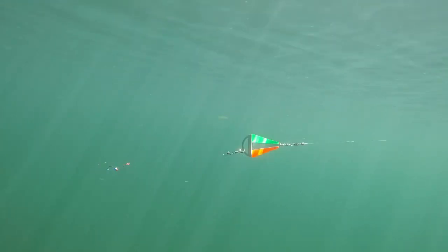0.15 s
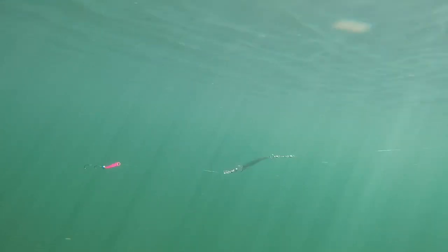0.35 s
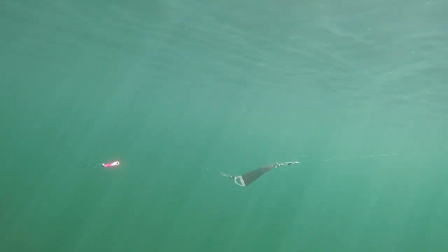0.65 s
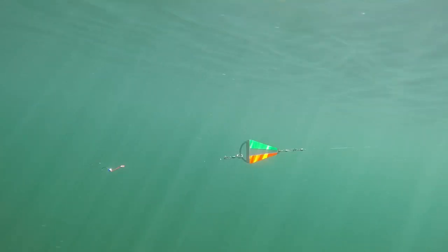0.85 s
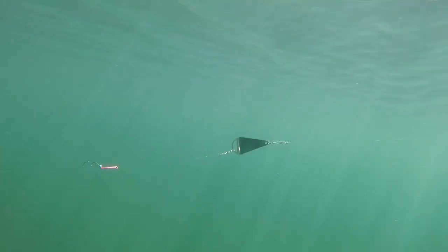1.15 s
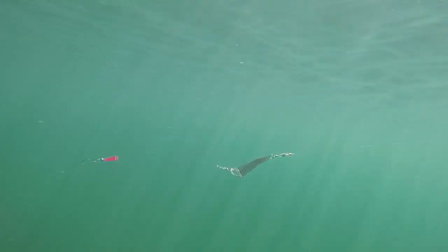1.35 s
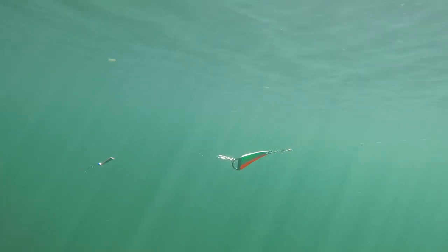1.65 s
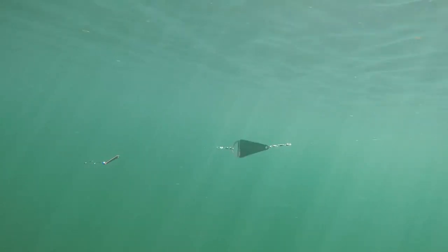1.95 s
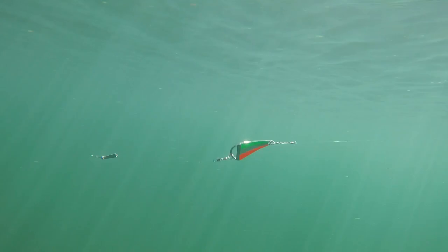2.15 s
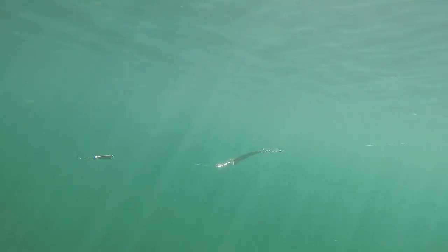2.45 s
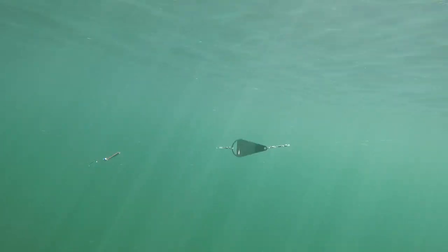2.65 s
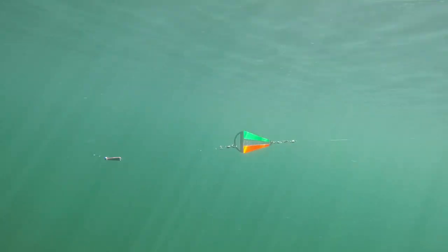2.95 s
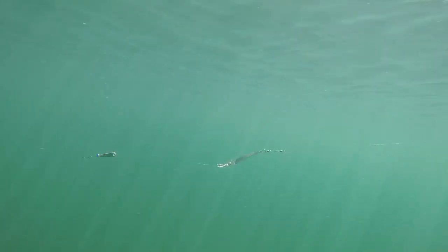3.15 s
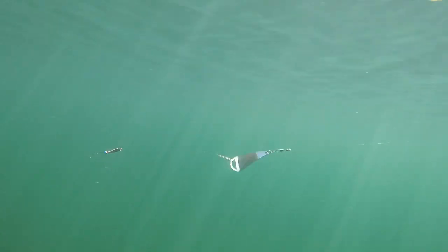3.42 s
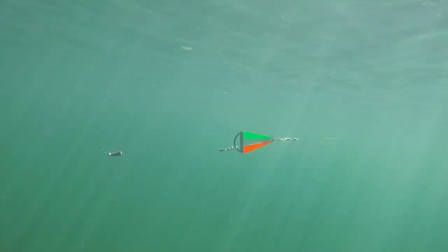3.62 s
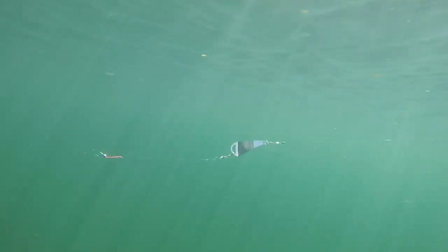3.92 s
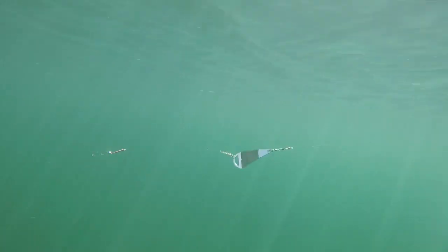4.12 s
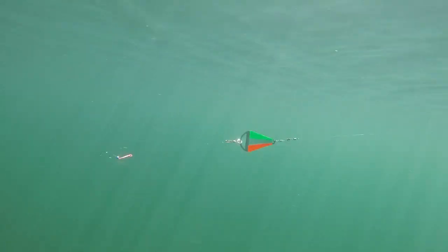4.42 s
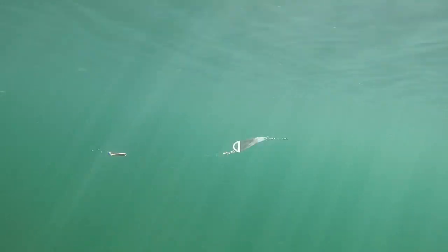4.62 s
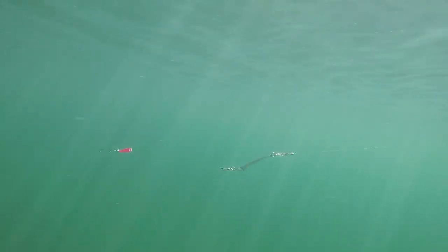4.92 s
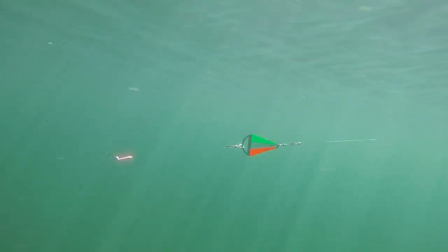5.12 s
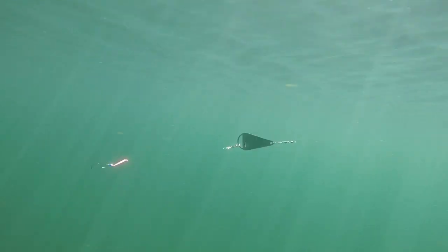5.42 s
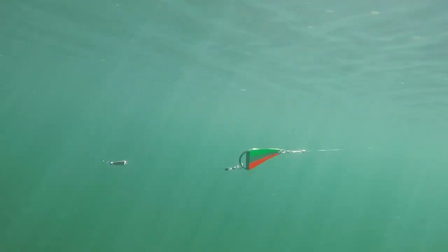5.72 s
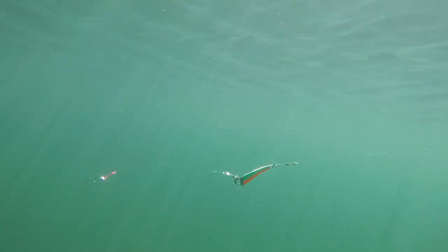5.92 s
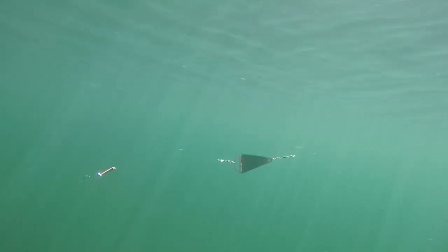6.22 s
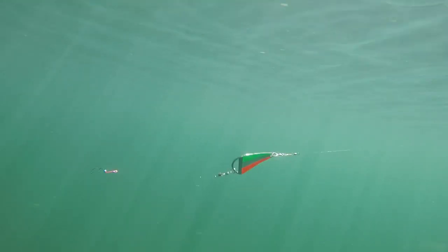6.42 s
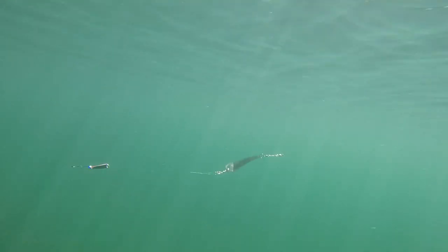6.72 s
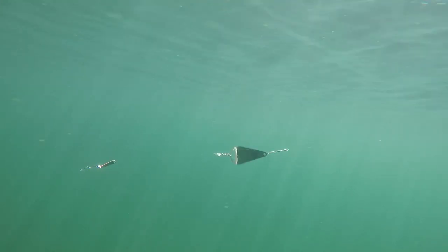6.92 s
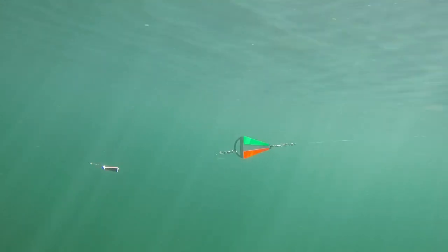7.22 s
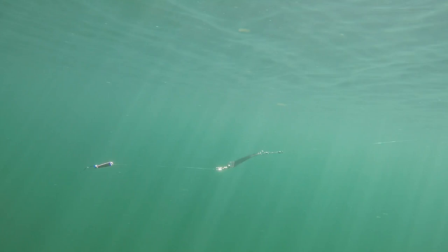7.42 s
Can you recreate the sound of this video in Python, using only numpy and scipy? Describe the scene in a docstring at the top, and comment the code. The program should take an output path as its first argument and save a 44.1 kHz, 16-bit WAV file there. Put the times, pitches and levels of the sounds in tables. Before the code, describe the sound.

For about 7.5 seconds, a microphone sealed in a waterproof case is towed beneath a lake's surface with a fishing rig. Deep, wavering flow rumble and quicker low buffeting run throughout, over thin hiss. Bubbles ping, tick and glug irregularly from the start, with short dull resonance from the case. From 0.25 s soft low thumps knock the housing, several in pairs, firmer around 0.9 s. From 0.3 s a faint, high whistling electronic rasp swells about three times a second. A clear bubble ping stands out near 2.05 s. Crackling bubbles gather from 3.7 s, and at 4.25 s the heaviest thump makes everything duck, then slowly recover. More thumps come near 5 and 5.45 s, with bubbles bursting around 6 to 6.3 s. At 6.65 s an air pocket gives a tiny upward warble, under a tenth of a second long; pings and fine spray follow near 7 s.

```python
"""Underwater: a camera in a waterproof case is towed through a lake.
From the start, shaped noise rumbles over a hiss, while gliding, dying sine notes ping, tick and glug as bubbles.
From 0.25 s pairs of low notes thump the case; from 0.3 s the camera's electronics rasp about three times
a second, as swells of band noise. Near 4.25 s the hardest thump makes the limiter duck everything.
Near 6.65 s an air pocket warbles upward, a swept sine with one overtone."""
import sys
import numpy as np
from scipy import signal
from scipy.fft import rfft, irfft, next_fast_len
from scipy.io import wavfile
from scipy.ndimage import uniform_filter1d, minimum_filter1d, map_coordinates

SR = 44100
rng = np.random.default_rng(int(sys.argv[2]) if len(sys.argv) > 2 else 0)


def wav_out(sig):
    """Save sig, one row per channel (or a flat mono array), as 16-bit PCM at SR to the path in sys.argv[1]."""
    wavfile.write(sys.argv[1], SR, np.round(np.clip(np.atleast_2d(sig).T, -1, 1) * 32767).astype(np.int16))


N = 333837
TIME = np.arange(N) / SR

# spectrum of the larger wake bubbles: (frequency [Hz], relative density [dB])
WAKE_SPECTRUM = [(300, -28), (470, -16), (600, 0), (770, -9.5), (1000, -2), (1300, 2), (1700, -4.5),
                 (2050, -5.5), (2430, -4), (2750, -14), (3200, -25), (4400, -29.5)]
# spectrum of fine spray: (frequency [Hz], relative density [dB])
SPRAY_SPECTRUM = [(2500, -3.5), (3150, -1), (3450, 3), (3900, 5.5), (4350, -16), (5200, 1), (6200, -10.5),
                  (7300, -11), (8200, -17), (10200, -14), (15000, -23)]
# air pockets bursting into crackle: (time [s], level before trim [dB])
SPLASH_EVENTS = [(0.057, -26), (0.754, -30), (0.899, -17), (1.137, -20), (2.053, -20), (2.841, -35),
                 (3.659, -15), (3.901, -16.5), (3.972, -15.5), (4.167, -15), (4.248, -16), (5.367, -16.5),
                 (5.535, -35), (5.715, -19), (6.002, -26), (6.094, -23), (6.3, -13.5), (6.557, -26),
                 (6.929, -16), (6.973, -17.5)]


def from_db(db):
    """Decibels to amplitude gain."""
    return 10 ** (np.asarray(db) / 20)


def rms_one(x):
    """Scale to unit power."""
    return x / np.sqrt(np.mean(x ** 2) + 1e-20)


def in_time(rows):
    """Interpolate each column of a curve at every sample."""
    s, *columns = np.transpose(rows)
    return [np.interp(TIME, s, column) for column in columns]


def at_hz(points, hz):
    """Spectrum gain at the given frequencies; falls 12 dB an octave beyond its last point."""
    f, db = np.transpose(points)
    gain = from_db(np.interp(np.log(hz + 1e-3), np.log(f), db))
    return gain / np.maximum(hz / f[-1], 1) ** 2


def coloured(x, spectrum):
    """Shape a sound by a spectrum; white noise keeps its power."""
    size = next_fast_len(N)
    gain = rms_one(at_hz(spectrum, np.fft.rfftfreq(size, 1 / SR)))
    return irfft(rfft(x, size) * gain, size)[:N]


def drift(rate):
    """Smooth random curve of spread 1 through `rate` random knots a second."""
    knots = rng.standard_normal(4000)
    curve = map_coordinates(knots, [TIME[::20] * rate], order=3, mode="wrap")
    return rms_one(curve).repeat(20)[:N]


def noise(spectrum, lumpy_db, rate):
    """Coloured noise of unit power whose level wanders before colouring."""
    lumpy = rng.standard_normal(N) * from_db(lumpy_db * drift(rate))
    return rms_one(coloured(lumpy, spectrum))


def resonate(x, hz, width_hz):
    """Two-pole resonance with gain 1 on top."""
    r = np.exp(-np.pi * width_hz / SR)
    b = np.array([1, 0, -1]) * (1 - r * r) / 2
    a = [1, -2 * r * np.cos(2 * np.pi * hz / SR), r * r]
    return signal.lfilter(b, a, x + 1e-18)


def add(out, s, sound):
    """Mix a sound in at time s."""
    start = int(np.clip(s * SR, 0, N - 1))
    out[start:start + len(sound)] += sound[:N - start]


def gliding_notes(rows, peak_s, compact, glide):
    """Notes that swell until about peak_s, then die; higher compact shortens the tail."""
    out = np.zeros(N)
    for (s, db, hz), (life, bend, sign) in zip(rows, rng.standard_normal((len(rows), 3))):
        peak = peak_s * from_db(1.55 * life)
        t = TIME[:int(9 * peak * SR) + 2]
        shape = (t / peak * np.exp(1 - t / peak)) ** compact
        # the pitch passes through hz at the peak
        phase = 2 * np.pi * hz * t * (1 + glide * (1 + bend) * (t / peak - 2))
        add(out, s, np.sign(sign) * from_db(db) * shape * np.sin(phase))
    return out


def snaps(rows, t60, rise_s):
    """A quick, dying burst of white noise for each row."""
    out, t = np.zeros(N), TIME[:SR // 8]
    for s, db, *_ in rows:
        envelope = from_db(db - 60 * t / t60) * (1 - np.exp(-t / rise_s))
        add(out, s, envelope * rng.standard_normal(len(t)))
    return out


def bursts(times, rise_s, fall_s):
    """A smooth Gaussian swell around each time."""
    out, t = np.zeros(N), TIME[:SR // 2] - 1 / 4
    for s in times:
        add(out, s + t[0], np.exp(-(t / np.where(t < 0, rise_s, fall_s)) ** 2))
    return out


def swarm(spectrum, low_hz, high_hz, spread_db, count):
    """Rows (time [s], level [dB], pitch [Hz]) of bubbles born at random, most of them faint."""
    when, size, pitch = rng.random((count, 3)).T
    hz = low_hz * (high_hz / low_hz) ** pitch
    tilt_db = 20 * np.log10(at_hz(spectrum, hz) * hz / low_hz)
    db = spread_db * np.minimum(-np.log(size), 3) + tilt_db
    return np.transpose([when * N / SR, db, hz])


def electronics():
    """Steady hiss and a thin whistling rasp; every other burst is fuller near 9.1 kHz."""
    # hiss and rasp spectra: (frequency [Hz], relative density [dB])
    hiss_spectrum = [(1000, 10), (5000, 1.5), (9000, -0.5), (12000, -4.5), (14000, -5.5), (15000, -28)]
    rasp_spectrum = [(2500, -5), (5500, -1.5), (8000, -5), (9400, -0.5), (10300, -13.5), (12400, -1.5),
                     (13000, 6.5), (13500, -5), (15000, -5.5)]
    # whistles within the rasp: (frequency [Hz], width [Hz], relative level [dB])
    whistles = [(2984, 100, 4), (9900, 140, -13), (11740, 110, -13.5), (12770, 180, -7), (13080, 110, -8)]
    # each period is longer than the last by slackens_s
    first_s, period_s, slackens_s = .306, .3486, .00056

    white = rng.standard_normal(N)
    whine = sum(from_db(db) * rms_one(resonate(resonate(white, hz, w), hz, w)) for hz, w, db in whistles)
    rasp = from_db(-59.5) * noise(rasp_spectrum, lumpy_db=1.5, rate=550)
    rasp = rasp + from_db(-62.5 + 4.5 * drift(27)) * whine
    fuller = from_db(-62) * rms_one(resonate(resonate(white, 9100, 1700), 9100, 1700))
    k = np.arange(int(N / SR / period_s))
    times = first_s + period_s * k + slackens_s * k * (k - 1) / 2
    pulsing = bursts(times, rise_s=0.07, fall_s=0.045) * rasp
    pulsing += bursts(times[::2], rise_s=0.052, fall_s=.035) * fuller
    return pulsing + from_db(-61.5) * coloured(rng.standard_normal(N), hiss_spectrum)


def wake(churn_db, fizz_db):
    """Far bubbles: a swarm of faint pings and snaps over a thin wash."""
    far = gliding_notes(swarm(WAKE_SPECTRUM, 703, 2886, spread_db=6.0, count=1700),
                        peak_s=0.0021, compact=0.67, glide=0.006)
    fine = gliding_notes(swarm(SPRAY_SPECTRUM, 3110, 10550, spread_db=5.5, count=1100),
                         peak_s=0.00096, compact=1.3, glide=0.0016)
    when, size = rng.random((2, 420))
    pops = np.transpose([when * N / SR, 9.8 * np.minimum(-np.log(size), 3)])
    dull = rms_one(coloured(snaps(pops, t60=0.078, rise_s=0.00062), WAKE_SPECTRUM))
    sharp = rms_one(coloured(snaps(pops, t60=0.0088, rise_s=.002), SPRAY_SPECTRUM))

    churn = from_db(-3.5) * rms_one(far) + from_db(-4.5) * dull
    churn += from_db(-12) * noise(WAKE_SPECTRUM, lumpy_db=3.5, rate=55)
    fizz = from_db(0.5) * rms_one(fine) + from_db(-1) * sharp
    fizz += from_db(-12.5) * noise(SPRAY_SPECTRUM, lumpy_db=3.5, rate=94)
    return from_db(churn_db) * churn + from_db(fizz_db) * fizz


def gurgles(slosh_db):
    """Water burbles and big bubbles glug; one air pocket warbles upward with a weak overtone."""
    # large bubbles: (time [s], level before trim [dB], pitch [Hz])
    large_bubbles = [(0.059, -31, 617), (0.752, -33.5, 480), (1.135, -27, 570), (1.389, -29, 473),
                     (2.051, -24, 472), (2.416, -30, 516), (2.54, -30, 475), (3.33, -29.5, 490),
                     (3.933, -17.5, 607), (4.012, -27.5, 646), (4.164, -24, 381), (4.259, -19, 445),
                     (4.791, -27, 520), (5.481, -19, 572), (5.852, -30, 486), (6.002, -25, 676),
                     (6.105, -33, 598), (6.327, -20, 467), (6.557, -29, 584), (6.983, -27.5, 627),
                     (7.287, -28, 637)]
    # air pocket tearing away: (time [s], pitch [Hz], level before wobble [dB])
    pocket_path = [(6.645, 350, -54), (6.663, 455, -22), (6.68, 558, -36), (6.697, 604, -20),
                   (6.71, 560, -32), (6.725, 600, -33), (6.745, 620, -69)]
    # spectrum of the burble and spill: (frequency [Hz], relative density [dB])
    hollow_spectrum = [(280, 4.5), (390, 4), (465, -4), (520, 3), (585, -9), (740, -17.5), (840, -4),
                       (1100, -23)]

    burble = gliding_notes(swarm(hollow_spectrum, 393, 950, spread_db=6, count=260),
                           peak_s=.006, compact=0.47, glide=0.008)
    slosh = from_db(slosh_db - 3.5) * rms_one(burble)
    glugs = from_db(-5.5) * gliding_notes(large_bubbles, peak_s=0.0068, compact=0.87, glide=0.0028)
    spill = from_db(1) * coloured(snaps(large_bubbles, t60=0.077, rise_s=0.0013), hollow_spectrum)

    hz, db = in_time(pocket_path)
    phase = 2 * np.pi * np.cumsum(hz * (1 + 0.032 * drift(150))) / SR
    alive = (TIME > pocket_path[0][0]) & (TIME < pocket_path[-1][0])
    tone = np.sin(phase) + from_db(-14) * np.sin(2.5 * phase)
    pocket = alive * from_db(db + 2.0 * drift(120)) * tone
    return slosh + glugs + spill + pocket


def strays(level_db, low_hz, high_hz, over_db, spread_db, count):
    """Rows (time [s], level [dB], pitch [Hz]): a bubble per equal time slot, about over_db above level_db."""
    when, size, pitch = rng.random((count, 3)).T
    at = ((np.arange(count) + when) / count * N).astype(int)
    db = level_db[at] + over_db + spread_db * (size - .5)
    return np.transpose([at / SR, db, low_hz * (high_hz / low_hz) ** pitch])


def shed(low_hz, high_hz, spread_db, count):
    """Rows (time [s], level [dB], pitch [Hz]) of the bubbles each bursting pocket breaks into."""
    shed_s, below_db = .035, 16
    s, db = np.repeat(SPLASH_EVENTS, count, axis=0).T
    late, size, pitch = rng.random((len(s), 3)).T
    hz = low_hz * (high_hz / low_hz) ** pitch
    return np.transpose([s + shed_s * late, db - below_db - spread_db * size, hz])


def near_bubbles(churn_db, fizz_db):
    """Bubbles snap off, then ring, low ones longest; bursting pockets crackle and shed bubbles."""
    # close pinging bubbles: (time [s], level before trim [dB], pitch [Hz])
    close_bubbles = [(0.004, -23.5, 1074), (0.063, -34.5, 1000), (0.312, -19.5, 1005), (0.42, -23, 2427),
                     (0.421, -28.5, 1470), (0.53, -23.5, 2053), (0.723, -23, 950), (0.753, -22.5, 1220),
                     (1.137, -28, 1910), (1.173, -27, 1037), (1.263, -28, 1000), (1.858, -17.5, 2335),
                     (2.052, -12.5, 1300), (2.076, -22.5, 2300), (2.843, -20.5, 1436), (2.853, -21, 1100),
                     (2.892, -24, 1167), (3.342, -29, 965), (3.519, -26.5, 1390), (3.681, -22.5, 2360),
                     (3.901, -25.5, 1294), (3.942, -18, 1300), (3.995, -30.5, 1050), (4.099, -34, 1260),
                     (4.175, -25, 1034), (4.203, -26.5, 1300), (4.226, -25, 2390), (4.973, -21.5, 1260),
                     (5.379, -25, 1070), (5.434, -23, 760), (5.482, -27, 772), (5.535, -28, 1760),
                     (5.611, -22, 2200), (5.64, -23, 1246), (5.969, -19.5, 1270), (6.002, -26, 1465),
                     (6.171, -28, 2190), (6.321, -28, 2140), (6.515, -21, 2450), (6.645, -24.5, 2390),
                     (6.67, -17.5, 917), (6.866, -26, 1820), (6.895, -18, 1340), (6.928, -17.5, 1126),
                     (6.972, -20.5, 1470), (6.989, -27.5, 1224), (7.247, -27.5, 2710), (7.318, -20, 1120),
                     (7.356, -22, 2400)]
    # smallest bubbles: (time [s], level before trim [dB], pitch [Hz])
    tick_bubbles = [(0.059, -19.5, 3320), (0.663, -32, 3720), (1.564, -28, 3920), (1.742, -35, 3430),
                    (2.222, -33.5, 5100), (2.343, -35.5, 4900), (2.844, -27.5, 3720), (3.658, -33, 7200),
                    (3.681, -32, 3900), (3.974, -27.5, 4830), (4.169, -35, 3500), (4.249, -35, 3480),
                    (4.959, -31, 3940), (6.03, -37, 5060), (6.092, -24, 2870), (6.17, -31.5, 3770),
                    (6.671, -32.5, 3660), (6.423, -34, 3820), (6.7, -35, 5360), (6.971, -26.5, 3700),
                    (7.039, -36, 5130)]

    bubbles = np.vstack([close_bubbles,
                         strays(churn_db, 950, 1500, over_db=12.5, spread_db=3.5, count=18),
                         strays(churn_db, 2100, 2500, over_db=8.5, spread_db=14.5, count=14)])
    tiny = np.vstack([tick_bubbles,
                      strays(fizz_db, 3430, 5500, over_db=21, spread_db=4.5, count=22)])
    pings = from_db(1.0) * gliding_notes(bubbles, peak_s=0.0022, compact=1.16, glide=0.0074)
    # low bubbles get louder tails
    tail_rows = [(s, db - 7 * np.log2(hz / 1000), hz) for s, db, hz in bubbles]
    tails = from_db(-5.5) * gliding_notes(tail_rows, peak_s=0.0044, compact=0.53, glide=0.0024)
    ticks = from_db(-2.5) * gliding_notes(tiny, peak_s=0.00091, compact=0.69, glide=0.0022)
    crackle = from_db(-9) * snaps(bubbles, t60=0.046, rise_s=0.0022)
    crackle += from_db(-10.0) * snaps(SPLASH_EVENTS, t60=0.071, rise_s=0.00065)
    fragments = gliding_notes(shed(944, 2600, spread_db=5.5, count=4),
                              peak_s=0.0021, compact=0.92, glide=0.0028)
    spit = from_db(-2.5) * coloured(snaps(tiny, t60=0.0048, rise_s=0.00084), SPRAY_SPECTRUM)
    return pings + tails + ticks + coloured(crackle, WAKE_SPECTRUM) + fragments + spit


def scatter(x, t60, delay):
    """Dense weak echoes from the surface and inside the case: a decaying noise tail."""
    t = TIME[:SR // 5]
    tail = rng.standard_normal(len(t)) * from_db(-60 * t / t60) * (1 - np.exp(-t / delay))
    return signal.fftconvolve(x, tail / np.linalg.norm(tail))[:N]


def case(x):
    """Bubble sound passes the wall, sets its modes ringing and leaves a short smear."""
    # case resonances: (frequency [Hz], t60 [s], relative level [dB])
    wall_modes = [(482, 0.094, 9.5), (600, 0.12, -6), (787, 0.12, 4), (1012, 0.044, 14), (1180, 0.098, -6),
                  (1870, 0.058, -1.5), (2355, 0.014, 4.5), (3380, 0.022, 6)]
    ringing = sum(from_db(db) * resonate(x, hz, np.log(1000) / (np.pi * t60)) for hz, t60, db in wall_modes)
    through = from_db(-0.5) * (x + from_db(-13.5) * ringing)
    return through + from_db(-11.5) * scatter(x, t60=0.058, delay=0.0032)


def turbulence(rumble_db, buffet_db):
    """Slow pressure swings and quicker eddies; a hard eddy rocks the case and flexes its wall."""
    # hard eddies hitting the case: (time [s], level before trim [dB], pitch [Hz])
    thumps = [(0.247, -13.5, 188), (0.388, -2.5, 109), (0.439, 0, 171), (0.755, -11, 146),
              (0.903, -3, 155.6), (0.927, 3.5, 129), (1.487, -0.5, 116), (1.969, -6, 177), (2.103, 0, 184),
              (2.453, -5, 173), (2.886, -8, 170.5), (3.562, -4.5, 144.4), (3.795, -4, 129),
              (3.905, -5.5, 165), (4.173, 3.5, 119), (4.254, 12, 125.4), (4.996, 3.5, 109.6),
              (5.315, -7, 113), (5.453, 5.5, 138), (5.48, 0.5, 179), (6.207, -8, 126), (6.328, -8.5, 171),
              (6.646, -5, 143), (6.68, -4, 115)]
    # slow and quick flow noise spectra: (frequency [Hz], relative density [dB])
    rumble_spectrum = [(12, -34), (22, 4.5), (36, 9), (50, 1.5), (80, -8), (130, -28.5), (300, -52.5)]
    buffet_spectrum = [(50, -25), (85, -7), (113, 1.5), (145, -4), (190, -1), (240, -12.5), (300, -22),
                       (390, -35.5), (470, -31.5), (600, -39.5), (780, -76.5)]

    rumble = from_db(rumble_db) * noise(rumble_spectrum, lumpy_db=0.5, rate=11)
    buffet = from_db(buffet_db + 2.5) * noise(buffet_spectrum, lumpy_db=3.5, rate=45)
    rocking = gliding_notes(thumps, peak_s=0.0084, compact=1.04, glide=-0.0015)
    flex_rows = [(s, db, hz * 1.465) for s, db, hz in thumps]
    flexing = gliding_notes(flex_rows, peak_s=0.0049, compact=0.96, glide=-0.01)
    return rumble + buffet + from_db(-6.0) * rocking + from_db(-13) * flexing


def scene():
    """Flow on the case, air in its wake and the camera's own noise."""
    # flow along the case, levels before trim:
    # (time [s], slow pressure swings [dB], quick eddies [dB], sloshing [dB])
    flow_levels = [(0, -18.5, -23.5, -61), (.15, -18.5, -28, -69), (.33, -17, -21, -48),
                   (.6, -14, -23.5, -57.5), (.98, -14, -30.5, -50), (1.08, -21.5, -32, -62),
                   (1.22, -18.5, -20.5, -59), (1.35, -20, -27.5, -51.5), (2.0, -15, -26.5, -50.5),
                   (2.8, -17.5, -24, -45.5), (3.45, -15, -26, -48.5), (4.15, -15.5, -26, -51),
                   (4.45, -20.5, -29.5, -47), (5.2, -17.5, -27, -45), (5.85, -15.5, -25.5, -49.5),
                   (6.35, -17, -22.5, -55), (6.8, -14.5, -28, -59.5), (7.57, -17, -24.5, -40.5)]
    # air in the wake, levels before trim: (time [s], churning bubbles [dB], fine spray [dB])
    air_levels = [(0, -34.5, -65), (.15, -48.5, -63.5), (.55, -39.5, -61), (.94, -42, -60), (1.0, -47, -60),
                  (1.22, -41, -60.5), (1.7, -47, -63.5), (2.3, -43, -62), (3.5, -43, -60.5),
                  (3.7, -40, -57.5), (4.3, -37, -62), (4.82, -50, -66), (4.98, -36.5, -63),
                  (5.22, -49, -66), (5.4, -38, -59), (5.85, -45.5, -63.5), (6.95, -38.5, -56),
                  (7.57, -46.5, -65.5)]

    rumble_db, buffet_db, slosh_db = in_time(flow_levels)
    churn_db, fizz_db = in_time(air_levels)
    air = wake(churn_db, fizz_db) + gurgles(slosh_db) + near_bubbles(churn_db, fizz_db)
    return (electronics() + case(air) + turbulence(rumble_db, buffet_db))[None]


def limiter(x):
    """The gain ducks just ahead of any peak above the ceiling and creeps back up."""
    ceiling_db, recovery_db_per_s, lookahead_s = 0.2, 9.5, 0.0049
    size = int(lookahead_s * SR) + 1
    over_db = np.maximum(20 * np.log10(np.abs(x) + 1e-9) - ceiling_db, 0)
    ahead_db = -minimum_filter1d(-over_db, size)
    # running maximum against a ramp: a linear recovery in dB
    ramp_db = recovery_db_per_s * TIME
    duck_db = np.maximum.accumulate(ahead_db + ramp_db, axis=-1) - ramp_db
    return x * from_db(-uniform_filter1d(duck_db, size))


def record(dry):
    """Subsonic swings are cut, peaks duck the gain and the top is removed."""
    low_cut_hz, cutoff_hz = 12, 15050
    low_cut = signal.butter(2, low_cut_hz, "high", fs=SR, output="sos")
    top_cut = signal.ellip(14, .1, 80, cutoff_hz, fs=SR, output="sos")
    return signal.sosfilt(top_cut, limiter(signal.sosfilt(low_cut, dry)))


dry = scene()
out = record(dry)
wav_out(out)
```